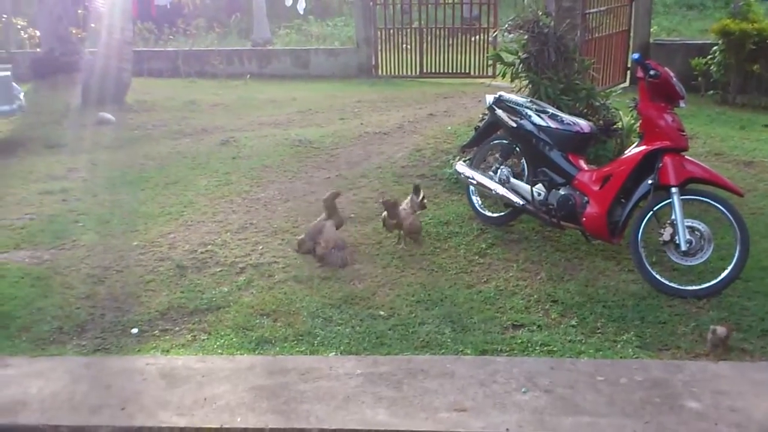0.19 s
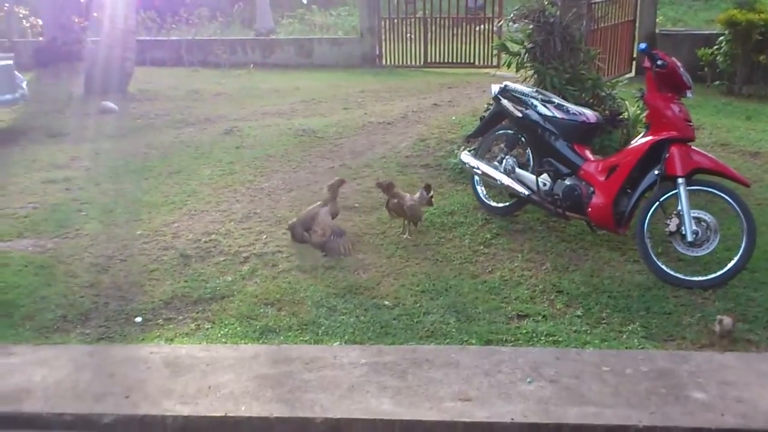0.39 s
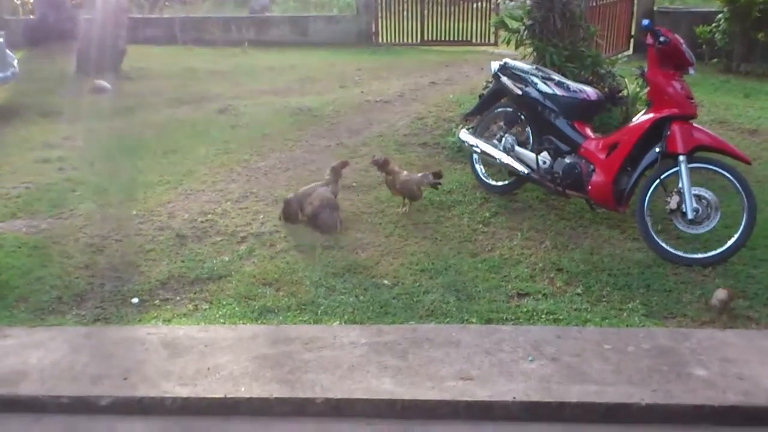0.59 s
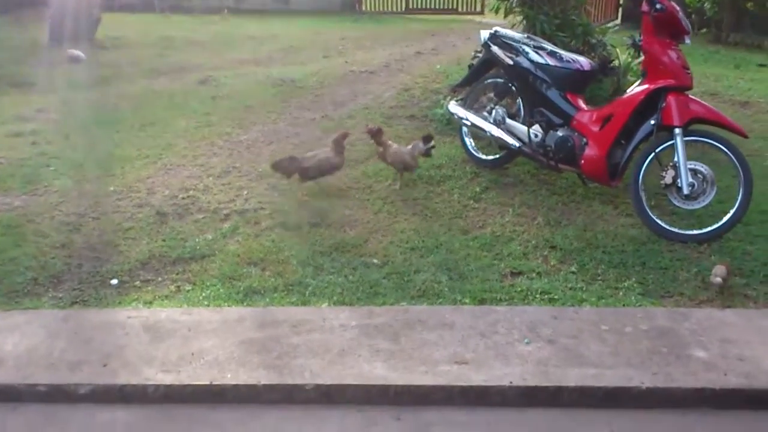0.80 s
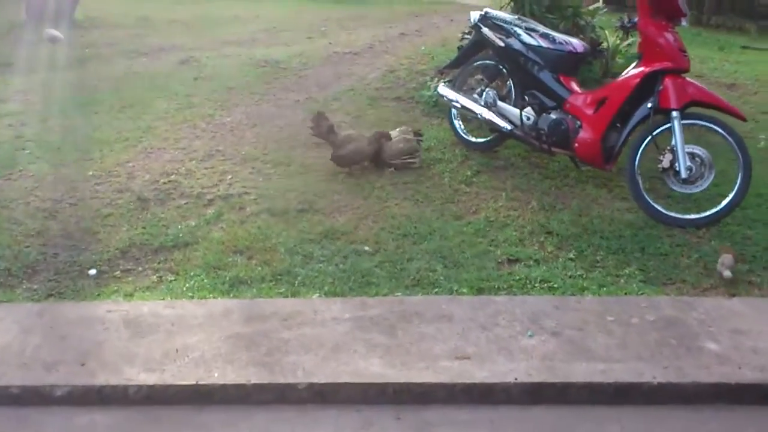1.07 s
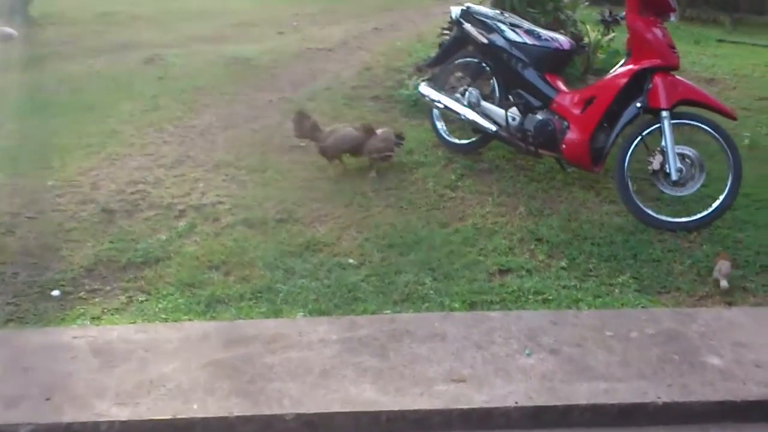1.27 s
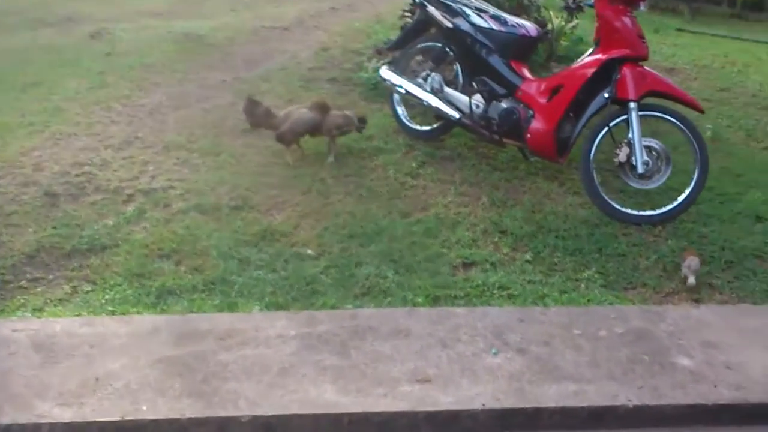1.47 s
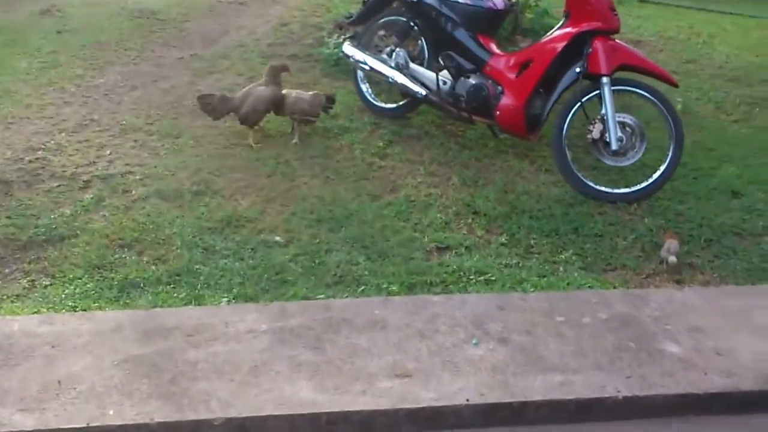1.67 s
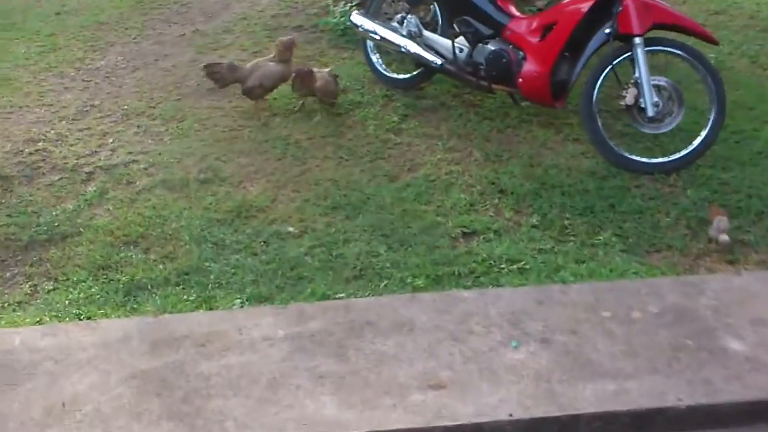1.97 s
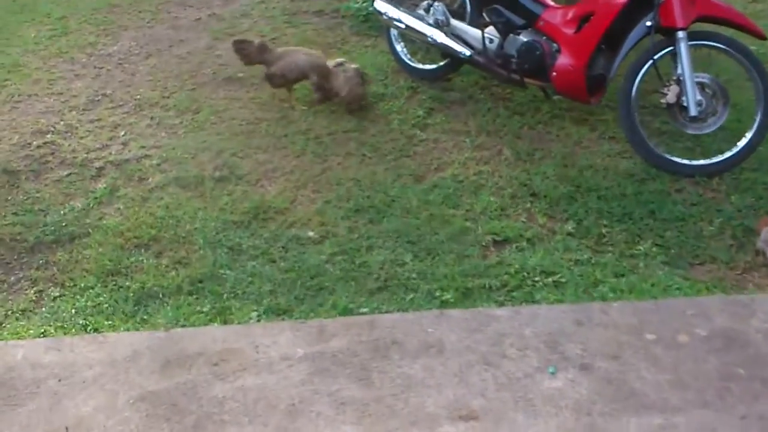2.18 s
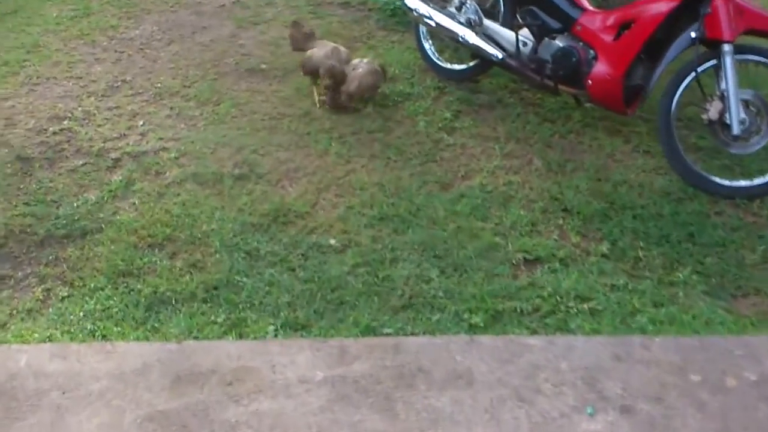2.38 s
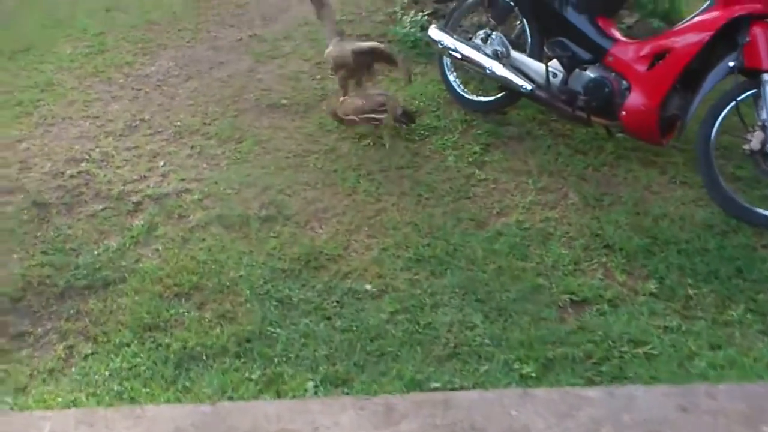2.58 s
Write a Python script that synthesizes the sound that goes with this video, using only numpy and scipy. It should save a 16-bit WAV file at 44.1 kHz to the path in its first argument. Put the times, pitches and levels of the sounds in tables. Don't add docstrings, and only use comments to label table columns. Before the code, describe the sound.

Short descending chick whistles come in uneven clusters, loudest early, slightly hazed by porch walls. Feathers rustle faintly on the lawn, then snap and flap near the end, over low distant traffic and phone hiss.

```python
import sys
import numpy as np
from scipy import signal
from scipy.fft import rfft, irfft
from scipy.io import wavfile
from scipy.ndimage import uniform_filter1d

SR = 44100
rng = np.random.default_rng(int(sys.argv[2]) if len(sys.argv) > 2 else 0)


def voltage_ratio(decibels):
    exponent = np.asarray(decibels, float) / 20
    return 10 ** exponent


def put_to_file(sound):
    columns = np.atleast_2d(sound).T
    safe = np.clip(columns, -1, 1)
    whole_steps = np.round(safe * 32767)
    wavfile.write(sys.argv[1], SR, whole_steps.astype(np.int16))


N = 119070

# [t/s, f/Hz, level/dB]
PEEP_1 = [(.19, 5600, -46.5), (.206, 5420, -40), (.218, 4650, -45), (.229, 3950, -38), (.243, 3500, -38.5),
          (.265, 3148, -30), (.295, 2930, -35), (.325, 3102, -31.5), (.34, 3194, -42.5)]
PEEP_2 = [(.435, 4050, -62), (.455, 4044, -63), (.475, 3770, -54), (.5, 3647, -52), (.53, 3570, -49),
          (.555, 3448, -47.5), (0.574, 3050, -51), (0.601, 2790, -53)]
PEEP_3 = [(.565, 4050, -55.5), (.592, 3794, -50.5), (.61, 3650, -55), (.63, 3520, -46), (.645, 3457, -45.5),
          (0.657, 3080, -39), (.672, 2984, -39.5), (.68, 2970, -50)]
PEEP_4 = [(.657, 5160, -55), (0.671, 5350, -34), (0.691, 5116, -34), (.706, 4130, -32),
          (0.739, 3914, -34.5), (.76, 3605, -34.5), (.78, 3232, -38), (0.797, 3080, -35.5),
          (0.837, 3140, -49)]
PEEP_5 = [(.925, 4040, -66), (.95, 4007, -55.5), (.965, 3850, -50.5), (.985, 3740, -46.5),
          (1.01, 3618, -46.5), (1.032, 3410, -47.5), (1.04, 3050, -44.5), (1.06, 2952, -45),
          (1.077, 2685, -50)]
PEEP_6 = [(1.085, 3860, -48), (1.11, 3650, -46.5), (1.121, 3350, -50.5), (1.145, 3190, -47.5),
          (1.159, 2920, -44), (1.188, 2848, -46.5), (1.215, 2715, -54)]
PEEP_7 = [(1.599, 4265, -63), (1.61, 3850, -53.5), (1.63, 3638, -47.5), (1.65, 3407, -54.5),
          (1.67, 3087, -46.5), (1.699, 2960, -47), (1.73, 2852, -53.5), (1.755, 2810, -65)]
PEEP_8 = [(1.68, 3820, -52), (1.699, 3680, -49.5), (1.75, 3497, -46.5), (1.78, 3334, -42.5),
          (1.80, 3190, -45), (1.85, 3216, -49), (1.898, 3136, -62.5)]
PEEP_9 = [(1.662, 6285, -61), (1.678, 6020, -49), (1.70, 5850, -55), (1.722, 5457, -56),
          (1.737, 4600, -44.5), (1.758, 3970, -42), (1.782, 3324, -44), (1.798, 2760, -42.5),
          (1.814, 2570, -53)]
PEEP_10 = [(2.13, 4404, -71), (2.155, 3960, -59), (2.19, 3693, -54.5), (2.23, 3504, -47.5),
           (2.256, 3400, -46.5), (2.266, 3057, -49), (2.28, 2700, -53), (2.295, 2500, -61)]
PEEP_11 = [(2.313, 4060, -59), (2.346, 3620, -49), (2.402, 3484, -44.5), (2.433, 3215, -50),
           (2.466, 2870, -45.5), (2.495, 2557, -52)]
# [left minus right/dB, octave overtone/dB, left lag/ms, send to walls/dB]
PEEPER_PLACES = [(9.5, -15, 0.069, -3), (-1.5, -11.5, -0.246, 3), (2, -11, -0.26, -1),
                 (-2, -14, 0.1155, -6), (2, -9, -0.286, 1), (2, -21.5, -0.31, 1.5), (-4, -17.5, -0.23, 4),
                 (6.5, -14.5, -0.34, -6), (-4.5, -19, 0.1, -8), (-2, -14.5, -0.315, 2),
                 (-4, -19, -0.25, -5.5)]
TWELFTHS_DB = [-25, -17, -17, -14.5, -23, -25, -25, -15, -10, -25, -23]
# [start t/s, length/s, from f/Hz, to f/Hz, level/dB]
FAR_FALLS = [
    (0.296, 0.074, 3017, 2570, -45.5),
    (0.611, 0.05, 2847, 2410, -48.5),
    (0.673, 0.038, 2936, 2465, -53),
    (1.055, 0.031, 2750, 2360, -57.5),
    (2.513, 0.015, 2814, 2605, -49.5),
]
# [start t/s, length/s, from f/Hz, to f/Hz, level/dB]
SLURS = [(0.19, 0.022, 5030, 4700, -49), (0.31, 0.054, 2160, 1985, -46.5), (0.34, 0.015, 2504, 2130, -45.5),
         (0.817, 0.022, 2460, 1824, -41), (1.822, 0.049, 2500, 2300, -47), (1.85, 0.038, 2180, 1885, -41),
         (1.02, 0.083, 4800, 4300, -64), (1.554, 0.028, 4900, 4900, -55.5), (1.58, 0.076, 4700, 4900, -61),
         (2.4, 0.031, 4850, 4500, -70), (1.888, 0.0127, 1800, 1600, -54), (.66, 0.026, 4900, 4750, -49),
         (.79, 0.028, 3000, 2480, -51), (1.728, .02, 5350, 5050, -58)]
# [start t/s, length/s, from f/Hz, to f/Hz, level/dB]
COOS = [
    (1.052, 0.016, 986, 947, -57),
    (1.252, 0.11, 1494, 1534, -70),
    (1.491, 0.1, 989, 979, -71),
    (1.76, 0.14, 944, 970, -68),
    (1.552, 0.49, 1631, 1624, -73.5),
    (2.151, 0.26, 1565, 1516, -67),
]
# [f/Hz, level/dB]
WALL_COLOUR = [(1500, -3), (3000, -1), (4200, 2), (5600, -7), (9000, 4)]
# [peak t/s, rise/s, fall/s, level/dB]
FLAPS = [
    (0.067, 0.065, 0.069, -54),
    (0.487, 0.0028, 0.0052, -52.5),
    (.69, .02, 0.024, -95),
    (1.051, 0.016, 0.045, -54.5),
    (1.15, 0.015, 0.027, -57.5),
    (1.73, 0.015, 0.058, -57.5),
    (2.512, 0.0093, 0.025, -55),
    (2.575, 0.0073, .01, -68),
    (2.616, 0.027, 0.021, -47.5),
    (2.691, 0.014, 0.023, -55.5),
]
# [t/s, peak level/dB]
SNAPS = [
    (.018, -45),
    (.076, -44),
    (2.573, -35),
    (2.582, -28),
    (2.595, -32),
    (2.608, -23),
    (2.6225, -27),
    (2.695, -38),
]
# [f/Hz, level/dB]
FLAP_COLOUR = [(150, 3.5), (500, 6.5), (1200, 3), (2500, 1.5), (5000, 2.5), (9000, -1), (13000, -7),
               (16000, -4)]
# [f/Hz, level/dB per Hz]
YARD_COLOUR = [(25, -6), (60, -0.5), (110, -1.5), (200, -9.5), (400, -15), (1200, -20.5), (3500, -23),
               (16000, -21.5)]
# [t/s, level/dB]
TRAFFIC = [(0, 0), (.5, 0), (1, -1), (1.4, -0.5), (1.9, 1), (2.3, -0.5), (2.7, 3)]
# [f/Hz, level/dB]
LEFT_PORT = [(30, -4), (200, -1.5), (3200, 3), (7000, 2.5), (9000, 8), (11600, 16), (12300, -8.5),
             (16000, -2.5)]
RIGHT_PORT = [(30, 1), (100, -0.5), (2000, -2), (3500, 6), (7000, 5), (8500, -9), (12000, -18), (16000, -4)]
# [start t/s, end t/s, low f/Hz, high f/Hz]
BAND_GAPS = [
    (.25, .288, 700, 2300),
    (.688, .732, 750, 2000),
    (.205, .29, 12100, 16500),
    (.655, .72, 12100, 16500),
    (.75, .85, 13500, 16500),
    (1.8, 1.885, 12100, 16500),
    (.558, .6, 4450, 5000),
    (.972, 1.02, 4300, 5000),
    (.705, .748, 6250, 6800),
]

EDGE_S, WAVER, FLUTTER_DB = 0.004, 0.007, 2.2
BEAK_HZ = 4730
ECHO_T60_S, TAIL_T60_S, TAIL_DB, FIRST_ECHO_S = 0.28, 0.99, -17.5, 0.0059
SLAP_S, SLAP_DB = (0.064, 0.03), (-24, -16.5)
YARD_DB, ALIKE_BELOW_HZ = -55, 400


def unit(x):
    return x / np.sqrt(np.mean(x ** 2))


def colour(x, points):
    p = np.array(points, float)
    hz = np.arange(N // 2 + 1) * SR / N + 1
    gain_db = np.interp(np.log(hz), np.log(p[:, 0]), p[:, 1])
    return irfft(rfft(x) * voltage_ratio(gain_db), N)


def walk(rate):
    k = int(SR / rate)
    held = np.repeat(rng.standard_normal(N // k + 1), k)
    return unit(uniform_filter1d(uniform_filter1d(held, k), k)[:N])


def place(x, pan_db, lag_ms):
    hz = np.arange(N // 2 + 1) * SR / N
    late = irfft(rfft(x) * np.exp(-2j * np.pi * hz * lag_ms / 1000), N)
    return np.array([late * voltage_ratio(pan_db / 2), x * voltage_ratio(-pan_db / 2)])


def whistle(rows, octave_db, twelfth_db, waver, flutter):
    s, hz, db = np.array(rows, float).T
    span = slice(int((s[0] - EDGE_S) * SR), int((s[-1] + EDGE_S) * SR))
    t = np.arange(span.start, span.stop) / SR
    pitch = uniform_filter1d(np.interp(t, s, hz), size=300) * (1 + waver[span])
    phase = 2 * np.pi * np.cumsum(pitch) / SR
    gate = np.clip(np.minimum(t - s[0], s[-1] - t) / EDGE_S + 1, 0, 1) ** 2
    overtones = np.sin(2 * phase) + voltage_ratio(twelfth_db) * np.sin(3 * phase)
    overtones = voltage_ratio(octave_db) / (1 + (pitch / BEAK_HZ) ** 10) * overtones
    level = voltage_ratio(np.interp(t, s, db) + flutter[span])
    out = np.zeros(N)
    out[span] = np.sqrt(2) * (np.sin(phase) + overtones) * gate * level
    return out


def chick_peeps(waver, flutter):
    peeps = [PEEP_1, PEEP_2, PEEP_3, PEEP_4, PEEP_5, PEEP_6, PEEP_7, PEEP_8, PEEP_9, PEEP_10, PEEP_11]
    direct, sent = 0, 0
    for rows, spot, twelfth_db in zip(peeps, PEEPER_PLACES, TWELFTHS_DB):
        pan_db, octave_db, lag_ms, wet_db = spot
        peep = whistle(rows, octave_db, twelfth_db, waver, flutter)
        direct = direct + place(peep, pan_db, lag_ms)
        sent = sent + peep * voltage_ratio(wet_db)
    return direct, sent


def side_note(row, waver, flutter):
    start, length, from_hz, to_hz, db = row
    rows = [(start, from_hz, db - 4),
            (start + length / 2, (from_hz + to_hz) / 2, db),
            (start + length, to_hz, db - 2)]
    return whistle(rows, -30, -25, waver, flutter)


def walls(x):
    t = np.arange(int(0.8 * SR)) / SR
    echoes = rng.standard_normal((2, len(t))) * voltage_ratio(7.2 * rng.standard_normal((2, len(t))))
    early = echoes * voltage_ratio(-60 * t / ECHO_T60_S) / 2
    tail = rng.standard_normal((2, len(t))) * voltage_ratio(TAIL_DB - 60 * t / TAIL_T60_S)
    reply = (early + tail) * (t > FIRST_ECHO_S)
    reply = reply / np.sqrt(np.sum(reply ** 2, axis=1, keepdims=True))
    slap = np.array([np.roll(x, int(s * SR)) * voltage_ratio(db) for s, db in zip(SLAP_S, SLAP_DB)])
    return signal.fftconvolve(x[None], reply, axes=1)[:, :N] + slap


def birds():
    waver, flutter = WAVER * walk(120), FLUTTER_DB * walk(130)
    direct, sent = chick_peeps(waver, flutter)
    slurs = sum(side_note(row, waver, flutter) for row in SLURS)
    coos = sum(side_note(row, waver, 5.2 * walk(25.15)) for row in COOS)
    far_falls = sum(side_note(row, waver, flutter) for row in FAR_FALLS)
    direct = direct + place(slurs + coos, -0.84, 0.065) + place(far_falls, 0.71, -0.27)
    sent = sent + voltage_ratio(-9.0) * slurs + voltage_ratio(1) * far_falls + voltage_ratio(-4.5) * coos
    return direct + walls(colour(sent, WALL_COLOUR))


def wings():
    t = np.arange(N) / SR
    beats = 0
    for peak, rise, fall, db in FLAPS:
        beats = beats + voltage_ratio(db) * np.exp(np.where(t < peak, (t - peak) / rise, (peak - t) / fall))
    roughness_db = 2.0 * rng.exponential(size=N) + 2.25 * walk(300)
    grains = rng.standard_normal((3, N)) * voltage_ratio(roughness_db)
    rustle = unit(colour(grains[:1] + 1.05 * grains[1:], FLAP_COLOUR)) * beats
    ticks = np.zeros(N)
    for s, db in SNAPS:
        ticks[int(s * SR)] = voltage_ratio(db)
    return rustle + place(colour(ticks, FLAP_COLOUR), -2.0, -0.12)


def yard():
    hz = np.arange(N // 2 + 1) * SR / N + 1
    alike = 0.86 / (1 + (hz / ALIKE_BELOW_HZ) ** 2) / (1 + (45 / hz) ** 4)
    mid, side = rfft(rng.standard_normal((2, N)))
    mid, side = mid * np.sqrt(1 + alike), side * np.sqrt(1 - alike)
    both = np.array([mid + side, mid - side])
    swell_db = np.interp(np.arange(N) / SR, *np.array(TRAFFIC).T)
    out = 0
    for octave in np.arange(4, 15):
        band = np.cos(np.pi / 2 * np.clip(np.log2(hz) - octave, -1, 1)) ** 2
        level_db = swell_db / (1 + 0.21 * (octave - 4)) + 1.44 * walk(8.2)
        out = out + irfft(both * band, N) * voltage_ratio(level_db)
    return unit(colour(out, YARD_COLOUR)) * voltage_ratio(YARD_DB)


def scene():
    return birds() + wings() + yard()


def band_limit(x):
    return signal.sosfilt(signal.butter(12, 15760, fs=SR, output="sos"), x)


def record(dry):
    x = np.array([colour(dry[0], LEFT_PORT), colour(dry[1], RIGHT_PORT)])
    t = np.arange(N) / SR
    for start, end, low, high in BAND_GAPS:
        gate = np.clip(np.minimum(t - start, end - t) / 0.01 + 0.5, 0, 0.93)
        band = colour(x, [(0.92 * low, -40), (low, 0), (high, 0), (1.06 * high, -40)])
        x = x - gate * band
    return band_limit(x)


dry = scene()
out = record(dry)
put_to_file(out)
```